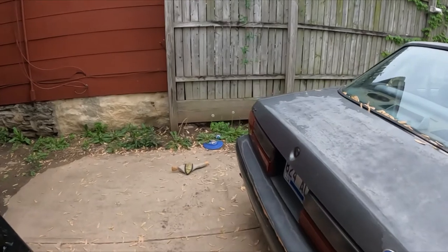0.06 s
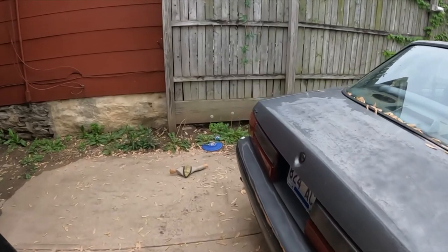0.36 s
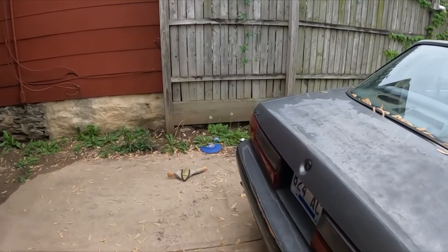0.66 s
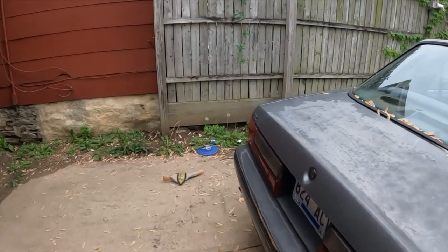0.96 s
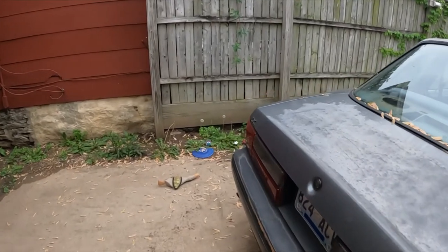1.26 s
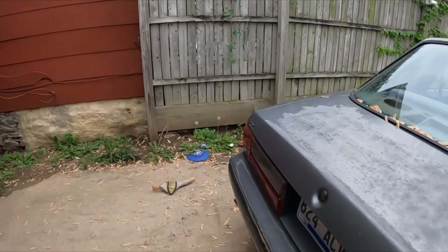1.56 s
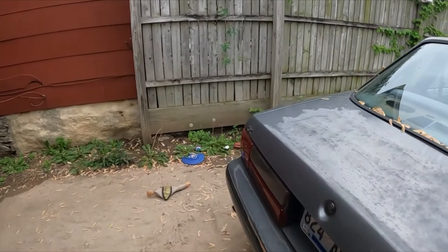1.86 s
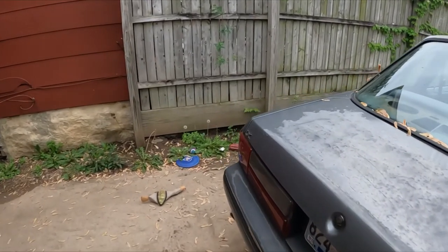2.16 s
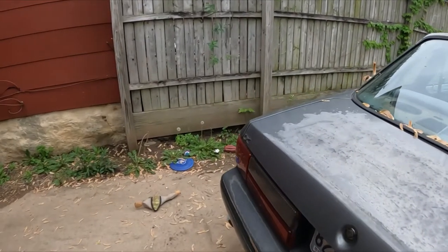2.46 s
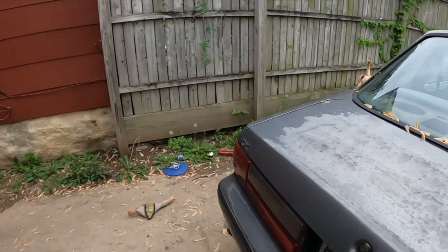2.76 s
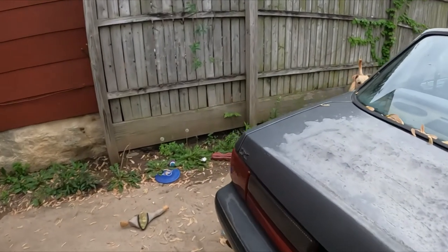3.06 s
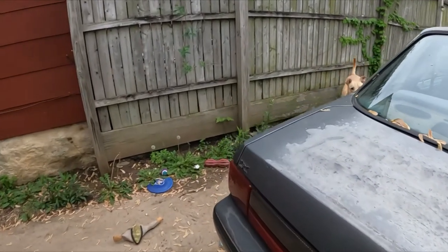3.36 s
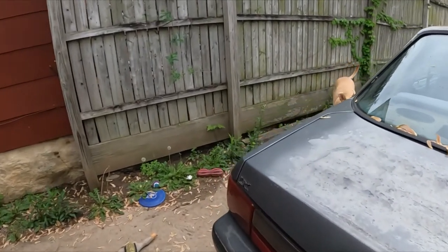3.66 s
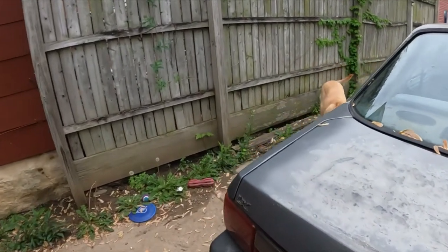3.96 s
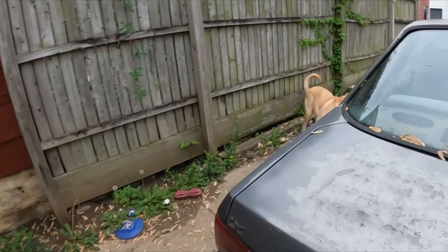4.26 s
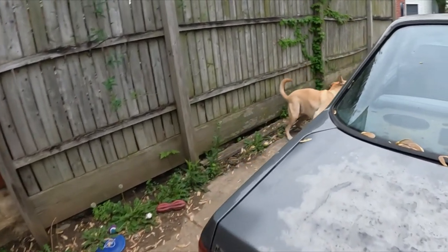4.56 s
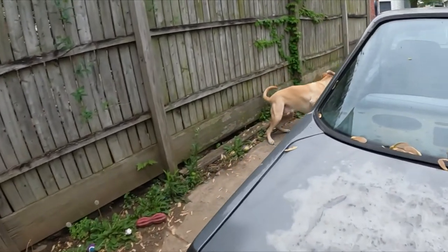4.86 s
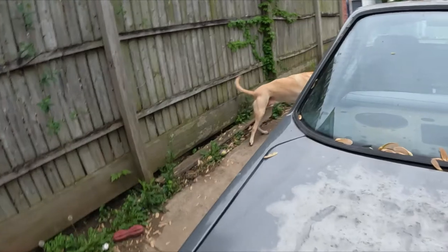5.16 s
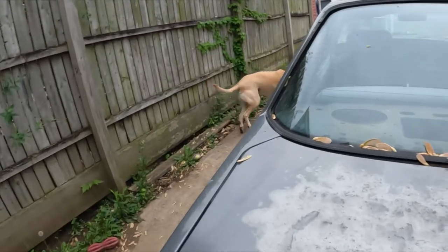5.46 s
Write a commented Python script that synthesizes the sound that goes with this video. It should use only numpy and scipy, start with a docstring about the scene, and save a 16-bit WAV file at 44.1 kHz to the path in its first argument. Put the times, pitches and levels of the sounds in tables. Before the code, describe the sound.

Slowed-down footsteps thud and crunch on gritty concrete and dry seeds, with faint low bird whistles and soft microphone rubbing.

```python
"""A slow-motion walk over a concrete pad in a fenced yard, sounding two octaves down.
From the first second soles thud, tap and grind on grit, while birds whistle far off until about 3 s.
Around 4 s dry seeds crack underfoot in quick succession and a sleeve drags. After 5 s the heaviest
steps land, the hand-held camera rubs and bumps, and moving air sways the microphone most strongly.
Throughout, fence and wall return a short echo over a faint bird chorus and an outdoor murmur."""
import sys
import numpy as np
from scipy import signal
from scipy.fft import rfft, irfft, next_fast_len
from scipy.io import wavfile

SR = 44100
rng = np.random.default_rng(int(sys.argv[2]) if len(sys.argv) > 2 else 0)


def transcribe(u):
    """Save the signal u as a 16-bit wav file named by the first command-line argument.

    u: samples, shape (n,) or (channels, n), limited to [-1, 1]; the rate is SR.
    q: integer samples, one column per channel.
    """
    v = np.clip(np.atleast_2d(u).T, -1, 1)
    q = np.round(v * 32767).astype(np.int16)
    wavfile.write(sys.argv[1], SR, q)


N = 251811

# shoe contacts: t/s, tap level/dB, thud level/dB, snap level/dB
CONTACTS = [(.379, -40, -47.5, -44), (0.496, -55.5, -49.5, -55), (.719, -31.5, -23, -36),
            (.738, -33.5, -34.5, -39.5), (0.873, -39.5, -35, -39), (.884, -30.5, -41, -28.5),
            (.945, -52.5, -43, -37), (1.113, -62, -44.5, -46), (1.326, -54, -45.5, -58),
            (1.885, -57, -57, -53.5), (1.963, -44.5, -33, -43.5), (2.104, -32, -25.5, -39.5),
            (2.381, -59, -57, -52.5), (2.753, -51, -46.5, -64.5), (2.798, -42.5, -51, -59.5),
            (2.899, -60, -62.5, -63), (3.068, -33.5, -27.5, -36.5), (3.075, -34, -28.5, -36),
            (3.164, -57.5, -51, -51.5), (3.56, -37.5, -34, -63.5), (3.76, -41.5, -43, -39.5),
            (3.856, -36.5, -45.5, -38.5), (5.066, -36.5, -40, -43), (5.078, -41, -20.5, -34),
            (5.123, -42.5, -26, -41), (5.138, -43.5, -23.5, -53.5), (5.247, -36.5, -17.5, -48),
            (5.291, -48.5, -25, -50.5), (5.313, -29.5, -28, -37.5), (5.326, -39, -28, -48.5),
            (5.41, -48, -28.5, -46), (5.443, -35.5, -33.5, -42.5)]
# dry seeds breaking: t/s, level/dB, f/Hz
SEED_CRACKS = [(0.738, -32.5, 1450), (.778, -30, 826), (0.905, -30.5, 1874), (1.304, -44, 1140),
               (1.522, -49.5, 1470), (1.871, -38.5, 1270), (3.066, -33.5, 1870), (3.752, -31, 1115),
               (3.775, -32, 1243), (3.857, -33, 1220), (3.915, -38.5, 1028), (3.953, -21.5, 1125),
               (3.99, -29.5, 1218), (4.027, -21, 1105), (4.037, -16, 1258), (4.0533, -21.5, 1330),
               (4.216, -29.5, 1110), (4.226, -21, 1248), (4.244, -30, 1444), (4.343, -28.5, 1260),
               (4.43, -27.5, 1716), (4.574, -29.5, 1053), (4.585, -26, 1045), (5.317, -28.5, 1696),
               (5.518, -25, 1343), (5.535, -30, 1540)]
# seeds and leaves crushed under a rolling sole: t/s, duration/s, leaf level/dB, grit level/dB
SOLE_CRUNCHES = [(0.742, 0.02, -39, -44), (0.77, .036, -41, -51.5), (0.906, .067, -54.5, -51.5),
                 (3.746, 0.074, -43, -48.5), (3.852, 0.032, -51, -49.5), (4.022, 0.055, -35, -44.5),
                 (4.218, 0.043, -44, -46), (4.387, 0.055, -39.5, -51), (4.51, .04, -41, -58),
                 (4.573, .066, -39.5, -47.5), (5.079, .07, -41, -49), (5.325, 0.078, -45, -68.5),
                 (5.507, .04, -44.5, -54), (5.655, .036, -46, -57.5)]
# loose sand shifting between steps: t/s, level/dB
SAND_SHUFFLE = [(0, -70.5), (.28, -77.5), (.45, -62), (.7, -62.5), (1.1, -66.5), (1.6, -72.5),
                (2.15, -65.5), (2.72, -73.5), (3.4, -62), (4.15, -56), (4.65, -54.5), (4.9, -62),
                (5.7, -54)]
# strokes of cloth and hand on the camera: middle t/s, duration/s, level/dB
CLOTH_STROKES = [(0.855, 0.51, -46.5), (3.123, .13, -45), (3.576, 0.62, -45), (3.993, 2.7, -54),
                 (4.046, 0.15, -49), (4.417, 0.1, -51), (4.593, 0.097, -43), (4.976, 0.12, -39.5),
                 (5.123, .2, -37.5), (5.384, 0.48, -38.5), (5.62, .16, -45)]
# soft bumps carried through the body to the camera: t/s, f/Hz, level/dB, rise time/s
BODY_BUMPS = [(.718, 379, -26, 0.0017), (0.793, 256.6, -32, 0.0075), (0.812, 247.6, -39.5, 0.041),
              (2.103, 408, -38.5, 0.0027), (2.96, 54.2, -29.5, 0.026), (5.133, 270, -25, 0.0043),
              (5.1402, 77.6, -21, 0.0046), (5.15, 55.9, -33.5, .016), (5.2464, 284, -24, 0.0027),
              (5.322, 334, -22, 0.0046), (5.376, 362, -30, 0.0074), (5.392, 307, -28.5, 0.034)]
# bird whistles, mostly falling: t/s, duration/s, start f/Hz, end f/Hz, level/dB
WHISTLES = [(.55, .048, 1423, 1347, -51.5), (0.585, .14, 1120, 910, -51), (0.595, 0.16, 2050, 1720, -60.5),
            (1.03, .18, 1264, 1110, -49.5), (1.86, .14, 1130, 1222, -45), (1.92, .15, 1291, 1112, -50.5),
            (2.207, 0.11, 1188, 1045, -54), (2.604, .15, 2040, 1503, -63), (3.107, .11, 1320, 1222, -47),
            (3.26, .087, 1245, 1063, -50.5)]
# envelopes of the far birds and of the air on the microphone: t/s, level/dB
CHORUS_LEVELS = [(0.0, -59), (0.43, -62.5), (0.78, -49), (0.95, -48.5), (1.32, -55), (1.65, -57),
                 (2.05, -50.5), (2.15, -49), (2.75, -61), (3.08, -58.5), (3.23, -53), (4.48, -49),
                 (4.77, -53.5), (5.04, -59.5), (5.53, -49.5), (5.71, -53)]
BUFFET_LEVELS = [(0, -31.5), (.6, -41.5), (1.2, -33.5), (2.3, -57), (3.4, -32.5), (4.8, -45.5),
                 (5.35, -17.5), (5.71, -19.5)]

# spectral densities of the sources: f/Hz, relative level/dB
THUD_SPECTRUM = [(40, -25), (150, -11), (290, -2.5), (460, 0), (620, -13), (900, -37), (2000, -63.5)]
TAP_SPECTRUM = [(300, -32), (700, -6), (1200, 0), (1500, -2.5), (1800, -2.5), (2200, -24), (3500, -41.5)]
SNAP_SPECTRUM = [(900, -33.5), (1900, -11.5), (2450, 3), (3000, -2), (3350, -14), (3700, -19), (4000, -31)]
LEAF_SPECTRUM = [(200, -15.5), (600, -9), (950, 1), (1300, 3), (1550, -2.5), (1780, 0.5), (2150, -22),
                 (3000, -17.5), (3700, -47.5)]
SAND_SPECTRUM = [(150, -24.5), (500, 2.5), (900, 2), (1300, 6), (1800, 2), (2150, -6.5), (2500, -5),
                 (3050, -8), (3400, -18.5), (4000, -35)]
CLOTH_SPECTRUM = [(30, -18), (80, -2.5), (160, -9), (260, 2), (360, -2.5), (500, -2), (680, -15),
                  (1100, -19), (2000, -32), (3000, -58.5)]
SLEEVE_SPECTRUM = [(50, -20), (110, 3), (160, 1.5), (290, -5.5), (400, -0.5), (700, -30), (1500, -73)]
CHORUS_SPECTRUM = [(500, -41.5), (800, -5.5), (1000, 4), (1180, 5.5), (1350, 0), (1550, -10.5),
                   (1800, -14.5), (2200, -51)]
BUFFET_SPECTRUM = [(1, -7.5), (3, 0.5), (5, -4.5), (8, -27.5), (15, -21.5), (30, -37.5), (60, -43),
                   (150, -88), (400, -120)]
MURMUR_SPECTRUM = [(12, -24.5), (20, -4), (30, -7), (38, -15), (58, -20), (103, -26.5), (125, -26),
                   (211, -31.5), (308, -26.5), (413, -29.5), (617, -35), (657, -41.5), (1180, -37.5),
                   (1800, -48.5), (3050, -87), (3960, -103), (6710, -120)]

# reverberation time of the yard: f/Hz, T60/s
YARD_T60 = [(100, 0.28), (1200, 0.35), (4000, 0.39)]
# near sounds at the two microphone ports: f/Hz, left minus right level/dB
NEAR_BALANCE = [(100, -1), (300, 3.5), (490, 3.5), (740, -7), (1130, 1.5), (1710, 6), (2600, 6.5)]
# width of diffuse sounds and of the echo: f/Hz, side minus mid level/dB
DIFFUSE_WIDTH = [(100, -11.5), (220, -11.5), (490, -1), (740, -6.5), (1130, -9.5), (1710, -6), (2600, -1.5)]
ECHO_WIDTH = [(100, -15.5), (280, -10.5), (600, -4.5), (3000, -7.5)]


def footfalls():
    """Impact excites a broad spectrum: a dull thud of the sole, a tap and a snap of trapped grit."""
    out = np.zeros((2, N))
    thud, tap, snap = pulse(THUD_SPECTRUM), pulse(TAP_SPECTRUM), pulse(SNAP_SPECTRUM)
    for s, tap_db, thud_db, snap_db in CONTACTS:
        add(out, s, amp(thud_db) * scattered(thud, t60=0.028, scatter_db=-1.3, width_db=-4))
        add(out, s, amp(tap_db) * scattered(tap, t60=0.026, scatter_db=7.5, width_db=-2.5))
        add(out, s, amp(snap_db) * scattered(snap, t60=0.037, scatter_db=1.5, width_db=-6.5))
    return out


def seeds():
    """Brittle fracture: a seed snaps and rings for a few cycles; crushed seeds and leaves crackle."""
    out, crush = np.zeros((2, N)), np.zeros(N)
    snap = amp(-21.5) * pulse(SNAP_SPECTRUM)
    for s, db, hz in SEED_CRACKS:
        crack = ping(hz, rise=1.56 / hz, size=len(snap)) + snap
        add(out, s, amp(db) * scattered(crack, t60=0.05, scatter_db=-6, width_db=-5))
    for s, length, leaf_db, _ in SOLE_CRUNCHES:
        add(crush, s, amp(leaf_db) * arch(length))
    return out + crush * grains(LEAF_SPECTRUM, per_s=600, spread_db=1.5)


def grit():
    """Rolling friction: sand grinds under the sole after contacts, in crunches and faintly between."""
    grinds = [amp(snap_db - 14) * slide(s, hold=0, fade_db_per_s=83.5) for s, _, _, snap_db in CONTACTS]
    rolls = [amp(grit_db) * slide(s, hold=length / 2, fade_db_per_s=171)
             for s, length, _, grit_db in SOLE_CRUNCHES]
    envelope = power_sum(grinds + rolls + [level(SAND_SHUFFLE)])
    return envelope * grains(SAND_SPECTRUM, per_s=1100, spread_db=2.5)


def cloth():
    """Stick-slip friction: cloth and fingers rub the camera in small slips; a sleeve drags once."""
    rubbing = power_sum(amp(db) * stroke(s, length) for s, length, db in CLOTH_STROKES)
    rubs = rubbing * grains(CLOTH_SPECTRUM, per_s=900, spread_db=3)
    dragging = amp(-47.5) * stroke(middle=3.65, length=0.72)
    return rubs + dragging * grains(SLEEVE_SPECTRUM, per_s=700, spread_db=3.5)


def bumps():
    """Damped resonance: each bump swells and rings briefly in the camera's body."""
    out = np.zeros(N)
    for s, hz, db, rise in BODY_BUMPS:
        add(out, s, amp(db) * ping(hz, rise))
    return out


def birds():
    """Frequency modulation: far whistles glide and flutter, blurred by echoes, over a faint chorus."""
    song = np.zeros((1, N))
    for s, length, start_hz, end_hz, db in WHISTLES:
        t = np.linspace(0, length, round(length * SR))
        flutter = 0.022 * np.interp(t, np.arange(100) / 200, rng.standard_normal(100))
        hz = np.linspace(start_hz, end_hz, len(t)) * (1 + flutter)
        add(song, s, amp(db) * arch(length) * np.sin(2 * np.pi * np.cumsum(hz) / SR))
    chorus = level(CHORUS_LEVELS) * stereo(coloured(rng.standard_normal((2, N)), CHORUS_SPECTRUM))
    return song + amp(-1) * yard(song) + chorus


def air():
    """Pressure fluctuation: a steady murmur, and slow swings at the microphone as the camera moves."""
    murmur = amp(-46.5) * stereo(coloured(rng.standard_normal((2, N)), MURMUR_SPECTRUM))
    buffet = level(BUFFET_LEVELS) * coloured(rng.standard_normal(N), BUFFET_SPECTRUM)
    return murmur + buffet * amp([[-4], [2.5]])  # stronger at the right port


def yard(x):
    """Reverberation: reflections from fence and wall decay exponentially, at a rate set by frequency."""
    hz, t, noise = signal.stft(rng.standard_normal((2, SR // 2)), SR, nperseg=256)
    decay = amp(-60 * t / along(YARD_T60, hz)[:, None])
    tail = signal.istft(noise * decay, SR, nperseg=256)[1]
    delayed = np.pad(x.mean(0), (600, 0))  # 14 ms of travel
    echo = signal.fftconvolve(delayed[None], tail / np.linalg.norm(tail), axes=1)[:, :N]
    return stereo(echo, ECHO_WIDTH)


def scattered(click, t60, scatter_db, width_db):
    """Scattering off ground and body gives a click a short tail, partly different at each port."""
    t = np.arange(len(click)) / SR
    mid, side = rng.standard_normal((2, len(t))) * amp(-60 * t / t60) * (1 - np.exp(-t / 0.002))
    ports = [mid + amp(width_db) * side, mid - amp(width_db) * side]
    tail = signal.fftconvolve(ports, click[None], axes=1)[:, :len(t)]
    return click + amp(scatter_db) * tail * np.linalg.norm(click) / np.linalg.norm(tail[0])


def pulse(spectrum, size=4096):
    """Minimum phase: folding the cepstrum gives a causal click of this spectrum, at peak 1."""
    magnitude = amp(along(spectrum, np.fft.rfftfreq(size, 1 / SR)))
    cepstrum = irfft(np.log(magnitude))
    cepstrum[1:size // 2] *= 2
    cepstrum[size // 2 + 1:] = 0
    click = irfft(np.exp(rfft(cepstrum)))
    return click / np.abs(click).max()


def ping(hz, rise, size=12000):
    """Damped oscillation whose envelope reaches 1 at the rise time."""
    t = np.arange(size) / SR
    return (t / rise * np.exp(1 - t / rise)) ** 2 * np.sin(2 * np.pi * hz * t)


def grains(spectrum, per_s, spread_db):
    """Shot noise: tiny impacts of random time and size, in stereo with this spectrum."""
    impacts = (rng.random((2, N)) < per_s / SR) * rng.choice([-1, 1], (2, N))
    sizes = amp(spread_db * np.clip(rng.standard_normal((2, N)), -2, 2))
    return stereo(coloured(impacts * sizes, spectrum))


def slide(s, hold, fade_db_per_s, attack=0.024):
    """Envelope of grit coming to rest: exponential decay begins at time s + hold."""
    t = np.arange(N) / SR - s
    return np.clip(t / attack, 0, 1) * amp(-fade_db_per_s * np.maximum(t - hold, 0))


def stroke(middle, length):
    """Envelope of a stroke, symmetric about its middle."""
    u = (np.arange(N) / SR - middle) / length
    return np.abs(np.cos(np.pi * u)) ** 0.86 * (np.abs(u) < 0.5)


def arch(length):
    """Envelope whose power follows a half sine."""
    return np.sqrt(np.abs(np.sin(np.linspace(0, np.pi, round(length * SR)))))


def level(rows):
    """Envelope through (t/s, level/dB) points, zero outside them."""
    s, db = np.transpose(rows)
    return np.interp(np.arange(N) / SR, s, amp(db), left=0, right=0)


def power_sum(gains):
    """Incoherent sources add in power."""
    return np.sqrt(sum(g ** 2 for g in gains))


def stereo(pair, width=DIFFUSE_WIDTH):
    """Partial coherence: one signal in phase at both ports, a weaker one in antiphase."""
    side = filtered(pair[1], lambda hz: amp(along(width, hz)))
    return np.array([pair[0] + side, pair[0] - side])


def coloured(x, spectrum):
    """Spectral shaping of x, normalised to rms 1."""
    shaped = filtered(x, lambda hz: amp(along(spectrum, hz)))
    return shaped / np.sqrt(np.mean(shaped ** 2) + 1e-20)


def filtered(x, response):
    """Linear filtering: the spectrum of x times a frequency response."""
    size = next_fast_len(N + SR // 2)
    return irfft(rfft(x, size) * response(np.fft.rfftfreq(size, 1 / SR)), size)[..., :N]


def along(points, hz):
    """Interpolation of (f/Hz, value) points in log frequency."""
    f, values = np.transpose(points)
    return np.interp(np.log(hz + 0.00069), np.log(f), values)


def add(track, s, sound):
    """Superposition of a sound on the track at time s."""
    part = track[..., max(round(s * SR), 0):][..., :sound.shape[-1]]
    part += sound[..., :part.shape[-1]]


def amp(db):
    """Amplitude ratio of a level in dB."""
    return 10 ** (np.asarray(db) / 20)


def scene():
    """Superposition of the walker's direct sound, its reverberation, birds and air."""
    walker = footfalls() + seeds() + grit() + cloth() + bumps()
    direct = filtered(walker, lambda hz: amp(np.outer([1, -1], along(NEAR_BALANCE, hz)) / 2))
    return direct + amp(-7) * yard(walker) + birds() + air()


def record(dry):
    """Imaging: slowed sound ends near 4 kHz; linear interpolation mirrors it faintly into the treble."""
    slow_rate_hz, slow_top_hz, top_hz = 12000, 4050, 15550
    slow = filtered(dry, lambda hz: 1 / np.sqrt(1 + (hz / slow_top_hz) ** 80))
    mirrored = slow * (1 + 2 * np.cos(2 * np.pi * slow_rate_hz * np.arange(N) / SR))
    droop = lambda hz: (np.minimum(hz, np.abs(slow_rate_hz - hz)) / (hz + 1e-9)) ** 2
    return filtered(mirrored, lambda hz: droop(hz) * (hz < top_hz))


dry = scene()
out = record(dry)
transcribe(out)
```